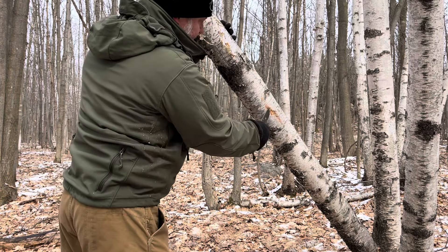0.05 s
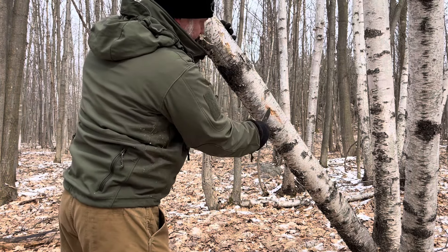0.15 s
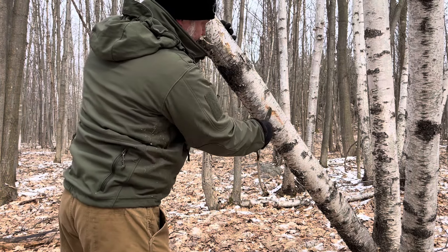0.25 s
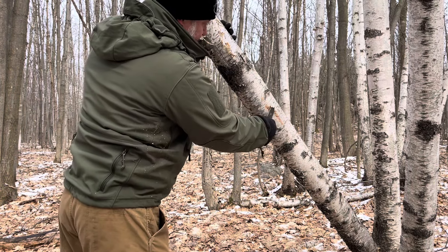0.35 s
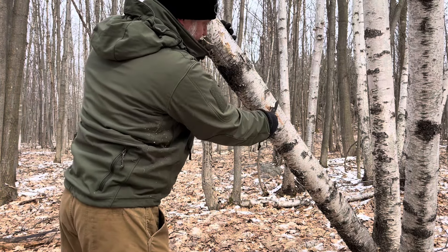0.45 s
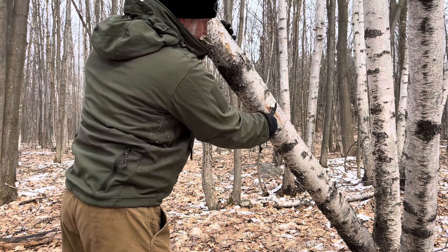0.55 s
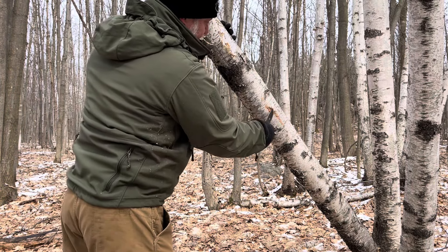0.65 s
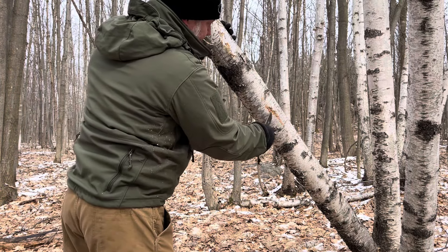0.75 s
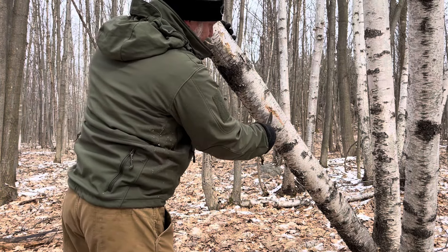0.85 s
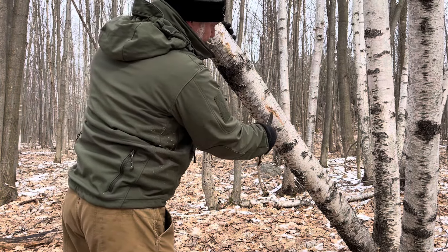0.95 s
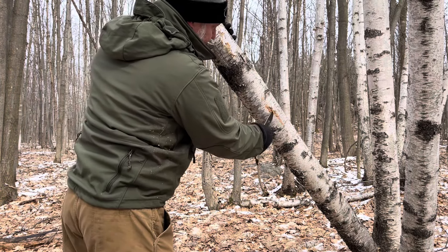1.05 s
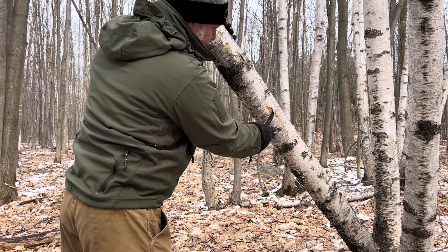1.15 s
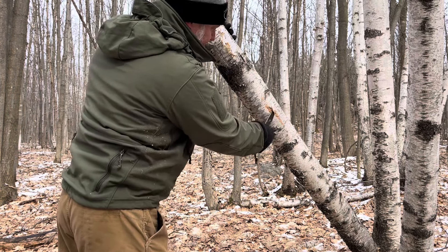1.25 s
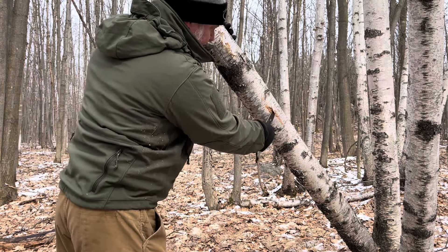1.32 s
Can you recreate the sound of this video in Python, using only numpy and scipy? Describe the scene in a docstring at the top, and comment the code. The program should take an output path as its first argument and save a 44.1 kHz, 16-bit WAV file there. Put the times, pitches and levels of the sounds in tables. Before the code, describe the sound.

Dry birch bark is pried and peeled from a trunk in a still, bare wood, heard close in stereo with a faint, steady distant rumble underneath. In the first 0.4 seconds bright, fizzy fibre snaps cluster together, with a very faint blade skid and a barely audible wavering low hum. Near-quiet follows, broken by a single crisp crack at 1.1 and small ticks around 1.7 to 1.9. From about 2 seconds rustling strokes, sharper snaps and dull wooden knocks gather, with two very short rips at 2.3 and 2.5. Scattered cracks and light taps continue through 3 to 4 seconds, then another brief tear comes at 4.2. After 4.6 the work grows forceful: crackling rustle, a low thump near 4.8, and the loudest hard snaps and a solid woody knock around 4.9 to 5.0. Strong snaps and rustles continue to the end near 5.5, with the faint hum briefly returning.

```python
"""Papery bark is worked loose from a leaning birch trunk in a bare winter wood, heard at two ports.
A far rumble of filtered noise runs throughout; a faint wavering tone hums at the start and near the end.
Fibres snap in bursts of noise from the first moment, a blade skids and sings, strokes rustle as crackle.
Decaying tones knock on the wood from about 2 s; two rips of swelling noise come near 2.4 s, a third
near 4.2 s, and then the strokes and snaps grow strongest towards the close."""
import sys
import numpy as np
from scipy import signal
from scipy.fft import rfft, irfft
from scipy.io import wavfile
from scipy.ndimage import uniform_filter1d

SR = 44100
rng = np.random.default_rng(int(sys.argv[2]) if len(sys.argv) > 2 else 0)


def dump(signal):
    """Clip the signal to [-1, 1] and save it as 16-bit WAV at the path in sys.argv[1]."""
    limited = np.clip(np.atleast_2d(signal).T, -1, 1)
    pcm = np.round(limited * 32767).astype(np.int16)
    wavfile.write(sys.argv[1], SR, pcm)


N = 244314  # samples, about 5.5 s


def gain_of(db):
    """Decibels to an amplitude factor."""
    return 10 ** (np.asarray(db) / 20)


def evened(x):
    """Scales each row to an rms of 1."""
    return x / np.sqrt(np.mean(x ** 2, -1, keepdims=True) + 1e-20)


def read(points, hz):
    """Reads a curve of (frequency, value) points along a logarithmic frequency axis."""
    f, value = np.transpose(points)
    return np.interp(np.log(hz + 1), np.log(f + 1), value)


def coloured(x, points, bump_hz=None, bump_db=0., bump_octaves=0.42):
    """Filters x by a spectrum, with an optional broad resonance for each row; rms 1."""
    hz = np.fft.rfftfreq(x.shape[-1], 1 / SR)
    outside = (hz < .7 * points[0][0]) | (hz > 1.4 * points[-1][0])
    db = read(points, hz) - 60 * outside
    if bump_hz is not None:
        octaves_off = np.log2((hz + 1) / bump_hz)
        db = db + bump_db * np.exp(-(octaves_off / bump_octaves) ** 2)
    return evened(irfft(rfft(x) * gain_of(db), x.shape[-1]))


def shaped(noise, envelope):
    """Noise under an envelope, with the energy of the envelope."""
    return evened(noise * envelope) * np.sqrt(np.mean(envelope ** 2, -1, keepdims=True))


def crackle(shape, per_s, grain_s, spread_db):
    """Loudness of many tiny fibre breaks: a few stand out, each swells and dies fast."""
    breaks = rng.random(shape) < per_s / SR
    size = gain_of(spread_db * np.minimum(rng.exponential(1, shape), 3)) * breaks
    r = np.exp(-2 / (grain_s * SR))
    energy = signal.lfilter([1], [1, -2 * r, r ** 2], size ** 2)
    return evened(np.sqrt(energy + 1e-12))


def place(times, sounds, lead=0):
    """Lays each sound at its time; lead is the number of samples before the marked moment."""
    mix = np.zeros(N + 2 * sounds.shape[1])
    for s, sound in zip(times, sounds):
        at = round(s * SR) - lead
        mix[at:at + len(sound)] += sound
    return mix[:N]


# Spectrum of the far rumble: (frequency [Hz], relative level [dB])
RUMBLE_SPECTRUM = [(22, -39), (40, -5.5), (70, 3), (302, -22), (700, -42), (1540, -120)]
RUMBLE_DB = -57.5  # level around which the rumble swells


def rumble():
    """Far low noise, nearly alike at both ports and less so towards its top."""
    hz = np.fft.rfftfreq(N, 1 / SR)
    a, b = rfft(rng.standard_normal((2, N)))
    apart = gain_of(read([(60, -23.5), (150, -10.0), (500, 1.0)], hz)) * b
    port_db = read(RUMBLE_SPECTRUM, hz) + np.array([[.4], [-.4]])  # slightly louder at left
    both = irfft(np.array([a + apart, a - apart]) * gain_of(port_db), N)
    drift = uniform_filter1d(rng.standard_normal(N), 9000)
    swell = evened(uniform_filter1d(drift, 9000))
    return gain_of(RUMBLE_DB + 1.8 * swell) * both / np.std(both)


# Faint low hum that comes and goes: (start [s], end [s], rms level when full [dB], mean pitch [Hz])
HUM_SPANS = [(0, 0.405, -61.5, 131), (4.557, 5.24, -63, 120.8)]


def hums():
    """A soft sine tone that wavers a little in pitch, faded in and out."""
    t = np.arange(N) / SR
    drift = uniform_filter1d(rng.standard_normal(N), 3000)
    waver = evened(uniform_filter1d(drift, 3000))
    warped_time = np.cumsum(1 + 0.0148 * waver) / SR
    mix = np.zeros(N)
    for start, end, db, hz in HUM_SPANS:
        fade = np.clip(np.minimum(t - start, end - t) / 0.061, 0, 1)
        mix += np.sqrt(2) * gain_of(db) * fade * np.sin(2 * np.pi * hz * warped_time)
    return mix


# The knife blade skids on the wood and sings: (time [s], level before the swell [dB], length [s])
BLADE_SKIDS = [(0.084, -62, 0.038), (0.755, -58.5, 0.016), (1.933, -53.5, 0.022)]
# Modes of the blade: (frequency [Hz], relative level [dB])
BLADE_MODES = [(1900, -9), (3720, -8), (6340, -5.5), (7600, -16), (10200, -3)]


def skids():
    """Rough friction feeds the blade's modes for a moment, each one fluttering."""
    s, db, length = np.transpose(BLADE_SKIDS)[..., None]
    hz, mode_db = np.transpose(BLADE_MODES)[..., None]
    t = np.arange(2048) / SR
    noise = rng.standard_normal((len(s), 2, len(BLADE_MODES), len(t)))
    re, im = uniform_filter1d(noise, 150).swapaxes(0, 1)
    modes = ((0.057 + re + 1j * im) * np.exp(2j * np.pi * hz * t)).real
    song = evened((gain_of(mode_db) * modes).sum(1))
    swell = np.sin(np.pi * np.clip(t / length, 0, 1))
    return place(s[:, 0], gain_of(db) * song * swell)


# Knocks of knife or knuckle on the wood: (time [s], level before the envelope [dB], pitch [Hz])
WOOD_KNOCKS = [(1.978, -46.5, 605), (2.194, -46, 710), (2.2235, -42.5, 427), (2.547, -46, 840),
               (2.777, -48.5, 536), (2.929, -65, 1520), (3.0147, -50, 830), (3.05, -48, 640),
               (3.3672, -45.5, 1740), (3.949, -42, 522), (3.9926, -47, 540), (4.767, -35, 270),
               (4.9877, -28, 635), (5.222, -48.5, 605), (5.2878, -46.5, 745)]
# Spectrum of the trunk: (frequency [Hz], relative level [dB])
TRUNK_SPECTRUM = [(120, -15.5), (300, -0.5), (560, -1), (1000, -6.5), (1400, -10.5), (2200, -33)]


def knocks():
    """A short dull blow on the trunk: a woody thud, then a few swings at the pitch of the spot."""
    s, db, hz = np.transpose(WOOD_KNOCKS)[..., None]
    t = np.arange(2048) / SR
    noise = rng.standard_normal((len(s), len(t)))
    thud = 0.6 * np.exp(-t / 0.003) * coloured(noise, TRUNK_SPECTRUM, hz, 16.0)
    swings = gain_of(-60 * t / 0.023) * np.sin(2 * np.pi * hz * t)
    onset = 1 - np.exp(-t / 0.00042)
    return place(s[:, 0], gain_of(db) * onset * (swings + thud))


# Strokes of the hand on the sheet: (start [s], length [s], rustle level [dB],
# thin-flake fizz over the rustle [dB], trunk body over the rustle [dB])
HAND_STROKES = [(0, 0.12, -77, 1, 3.5), (0.274, 0.16, -65, 9.5, -0.5), (0.571, 0.2, -70.5, 2.5, -7.5),
                (1.105, 0.012, -64.5, 2, 2.5), (1.225, 0.2, -71.5, -4.5, -5), (1.905, 0.23, -64, -3, -5),
                (2.087, 0.17, -65.5, -4, 3.5), (2.358, 0.29, -64, -0.5, -5.5), (2.7, 0.49, -75.5, -9, -17),
                (3.46, 0.92, -75, -2, -10), (4.213, 0.11, -63.5, -16, -8), (4.39, 0.32, -74.5, -12, -2),
                (4.603, 0.068, -59, -4.5, -3), (4.687, 0.068, -51, -3, -1), (4.834, 0.18, -57, 1, -2),
                (4.926, 0.16, -45.5, -2, -2), (5.091, 0.23, -58, -3, -5), (5.367, 0.043, -52.5, -0.5, -6.5),
                (5.437, 0.087, -62.5, -7, -3)]
ATTACK_DB_PER_S, RELEASE_DB_PER_S = 398, 246  # each stroke swells, holds, dies away
REST_DB = -81.5  # the sheet held still between strokes


def effort():
    """Loudness of sheet, flakes and trunk: the strokes add up in energy over the resting sheet."""
    start, length, db, fizz_db, body_db = np.transpose(HAND_STROKES)[..., None]
    t = np.arange(0, N + 64, 64) / SR
    into = t - start
    attack_db = ATTACK_DB_PER_S * np.minimum(into, 0)
    release_db = RELEASE_DB_PER_S * np.maximum(into - length, 0)
    levels = []
    for over_db in (0, fizz_db, body_db):
        strokes = gain_of(db + over_db + attack_db - release_db)
        level = np.sqrt(gain_of(REST_DB) ** 2 + (strokes ** 2).sum(0))
        levels.append(np.interp(np.arange(N) / SR, t, level))
    return levels


# Spectrum of the bark sheet: (frequency [Hz], relative level [dB])
SHEET_SPECTRUM = [(700, -51), (1500, -9), (2500, -6.5), (4000, -4.5), (6500, -5.5), (8500, -7),
                  (10500, -67)]
# Spectrum of the thin flakes: (frequency [Hz], relative level [dB])
FIZZ_SPECTRUM = [(6000, -11), (8500, -7), (10500, 1), (13500, -6.5), (15500, -7.5), (16500, -32)]


def peel():
    """Flexing bark crackles over a smoother rub: patches tick at their own pitch; the trunk pops."""
    level, fizz, body = effort()
    *sheet_noise, flake_noise, trunk_noise = rng.standard_normal((5, N))
    wide = np.hypot(.55, .8 * crackle(N, 300, .0004, 4.5))  # sharp breaks heard across all pitches
    *patches, flakes = evened(np.hypot(wide, 0.46 * crackle((4, N), 67, 0.00053, 1.0)))
    # the rasp shifts from patch to patch
    shift = evened(uniform_filter1d(rng.standard_normal((3, N)), 900))
    patches = patches * gain_of(2.5 * shift)
    patch_hz = np.array([[2200], [3700], [6200]])
    sheet = coloured(np.array(sheet_noise), SHEET_SPECTRUM, patch_hz, 44.0, 1.0) * patches
    rustle = evened(sheet.sum(0))
    hiss = flakes * coloured(flake_noise, FIZZ_SPECTRUM)
    pop_loudness = np.hypot(.6, .8 * crackle(N, 120, 0.004, 3.2))
    pops = coloured(trunk_noise * pop_loudness, TRUNK_SPECTRUM)
    return level * rustle + fizz * hiss + body * pops


# Fibre snaps: (time [s], level [dB], pitch of the sheet [Hz], fizz over the sheet [dB])
FIBRE_SNAPS = [(0.0738, -44, 4500, 0), (0.119, -30.5, 6740, 5), (0.2272, -43.5, 3750, 0),
               (0.2448, -53, 4500, 0), (0.2679, -42, 7000, 12), (0.2905, -46, 6500, 3),
               (0.3049, -25.5, 6200, 9), (0.3095, -24.5, 6300, 2), (0.339, -29, 7400, 12),
               (0.394, -43, 6000, 5), (0.408, -30, 6100, 4), (0.423, -32, 6300, -2), (0.566, -43, 6070, -4),
               (1.1194, -27, 5800, -7.5), (1.714, -35, 4540, -3.5), (1.8367, -39, 7060, -16),
               (2.1129, -36, 3130, -11), (2.2233, -25.5, 3200, -1), (2.283, -44, 2560, -10),
               (2.3111, -31, 3500, -6), (2.441, -42, 3900, -12), (2.4636, -33, 6500, 6),
               (2.4725, -19, 3460, -13), (2.614, -32.5, 3700, 12), (2.737, -44, 2630, 28),
               (2.7766, -28, 3580, 0), (2.807, -40, 7000, -1), (2.8445, -35.5, 4140, -3.5),
               (2.866, -38, 3330, -6), (2.957, -36.5, 5230, -3), (3.012, -35.5, 4600, -4),
               (3.049, -29.5, 3450, -2), (3.319, -39, 5270, -5), (3.3671, -27, 3570, -15),
               (3.463, -48.5, 4930, -7), (3.495, -46.5, 4170, -9), (3.612, -40, 6260, 12),
               (3.639, -26.5, 5400, 5), (3.795, -41, 4540, -12), (3.833, -38, 4500, 8.5),
               (3.8913, -28, 4570, -5), (4.062, -32.5, 6300, 1.5), (4.0957, -28.5, 5740, 0.5),
               (4.2169, -22.5, 4330, -3), (4.605, -44, 3000, -11), (4.613, -40.5, 3000, -13),
               (4.6822, -35.5, 4500, 6), (4.7037, -31, 4500, -17), (4.7165, -26, 3360, -25),
               (4.8942, -29, 3130, -20), (4.9283, -14.5, 3070, -4.5), (4.9342, -16.5, 3140, -26),
               (4.9425, -24, 4460, -14), (4.981, -28, 3200, -13), (4.988, -25, 2550, -8),
               (5, -14, 3200, -5.5), (5.1145, -24.5, 3050, -10), (5.168, -22.5, 3100, -3),
               (5.2873, -29, 2750, -17), (5.402, -30, 4400, 7), (5.411, -21, 3070, 1.5)]


def snaps():
    """A break is a faint creep of fibres, a quick crack, a weak rattle and a fainter tail."""
    s, db, hz, fizz_db = np.transpose(FIBRE_SNAPS)[..., None]
    t = (np.arange(4096) - 512) / SR
    after = np.maximum(t, 0)
    a, b = np.moveaxis(rng.standard_normal((len(s), 2, len(t))), 1, 0)
    rattle = crackle(a.shape, 500, .0003, 4)
    # decays are given as the seconds taken to fall 60 dB
    cracks = gain_of(-60 * after / 0.0029) + 0.19 * gain_of(-60 * after / 0.017) * rattle
    tail = gain_of(-34.0 - 60 * after / 0.17)
    ring = (1 - np.exp(-after / 0.00034)) * (cracks + tail)
    creep = 0.07 * np.exp(-abs(t) / 0.002) * rattle
    sheet = coloured(a, SHEET_SPECTRUM, hz, 11.2, 0.23)
    sheet = sheet + gain_of(fizz_db) * coloured(b, FIZZ_SPECTRUM)
    return place(s[:, 0], gain_of(db) * shaped(sheet, ring + creep), lead=512)


# Rips: (time of the peak [s], level [dB], rise [s], fall [s], pitch of the sheet [Hz],
# fizz over the sheet [dB], trunk knock relative to the rip [dB])
BARK_RIPS = [(2.326, -27, 0.0048, 0.0033, 5670, -9, -24.5), (2.482, -29.5, 0.0067, 0.0063, 5540, -1.5, -31),
             (4.183, -23.5, 0.0054, 0.001, 3760, -6.5, -21.5)]


def rips():
    """A tear runs through the sheet: ragged splintering swells, peaks and thins out over a trunk knock."""
    s, db, rise, fall, hz, fizz_db, knock_db = np.transpose(BARK_RIPS)[..., None]
    t = (np.arange(8192) - 2048) / SR
    a, b, c = np.moveaxis(rng.standard_normal((len(s), 3, len(t))), 1, 0)
    swell = np.exp(-(t / np.where(t < 0, rise, fall)) ** 2 / 2)
    after = np.exp(-abs(t) / np.where(t < 0, rise, .018))  # the loose flap shakes on
    ragged = .45 + .65 * crackle(a.shape, 900, .0003, 2.2)
    sheet = coloured(a, SHEET_SPECTRUM, hz, 14.3, 1.0)
    sheet = sheet + gain_of(fizz_db) * coloured(b, FIZZ_SPECTRUM)
    tear = shaped(ragged * sheet, swell + 0.19 * after)
    trunk = coloured(c, TRUNK_SPECTRUM, 920, 7.2)
    knock = gain_of(knock_db) * (0.39 * swell + 1.95 * after) * trunk
    return place(s[:, 0], gain_of(db) * (tear + knock), lead=2048)


# Phase by which the left port leads the right: (frequency [Hz], lead [rad])
LEFT_LEAD = [(1000, 0), (3000, .9), (5500, -.2), (8500, -3.2), (12000, -6.2), (16000, -9.5)]
# Level of the left port over the right: (frequency [Hz], difference [dB])
LEFT_LOUDER = [(100, 0.5), (700, 5), (2400, 4), (8000, 0.4)]


def ports(x, scatter_db):
    """Each port gets the direct sound with its own phase and level, plus its own scatter off the trunks."""
    hz = np.fft.rfftfreq(N, 1 / SR)
    half = gain_of(read(LEFT_LOUDER, hz) / 2) * np.exp(.5j * read(LEFT_LEAD, hz))
    t = np.arange(4096) / SR
    scatter = rng.standard_normal((2, len(t))) * gain_of(-60 * t / 0.034) * (t > .001)
    scatter /= np.linalg.norm(scatter, axis=1, keepdims=True)
    bounce = 1 + gain_of(-14.0) * np.exp(-2j * np.pi * hz * 0.0048)  # off the frozen ground
    direct = irfft(rfft(x) * bounce * np.array([half, 1 / half]), N)
    return direct + gain_of(scatter_db) * signal.oaconvolve(x[None], scatter, axes=1)[:, :N]


def scene():
    """Every group of sounds scatters through the wood in its own way; the spread-out rustle most."""
    bark = ports(peel(), scatter_db=-4)
    for x in (snaps(), knocks() + skids(), rips()):
        bark = bark + ports(x, scatter_db=-5)
    return bark + rumble() + hums()


EDGE_HZ = 16600  # top of the band


def record(dry):
    """The band limit: a steep low-pass."""
    lowpass = signal.firwin(511, EDGE_HZ, window=("kaiser", 9), fs=SR)
    return signal.oaconvolve(dry, lowpass[None], "same")


dry = scene()
out = record(dry)
dump(out)
```